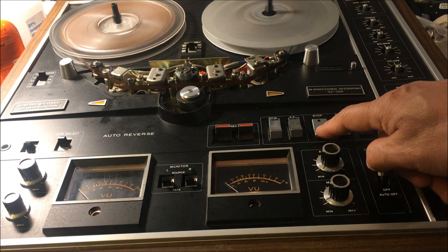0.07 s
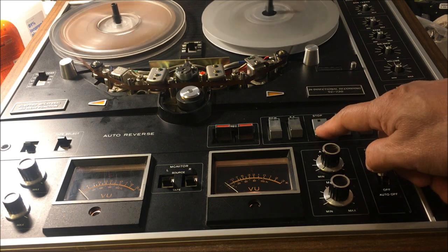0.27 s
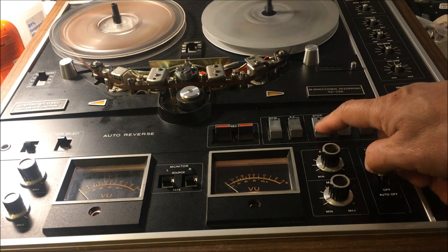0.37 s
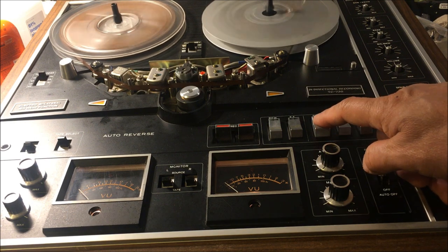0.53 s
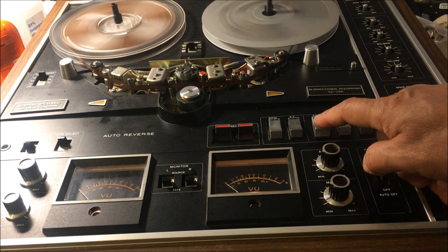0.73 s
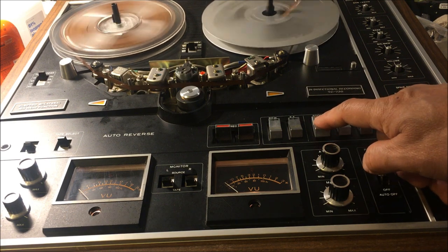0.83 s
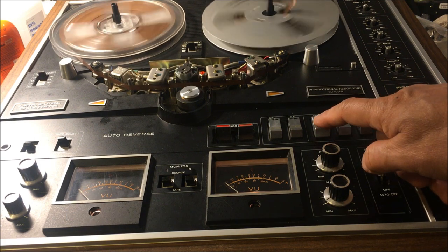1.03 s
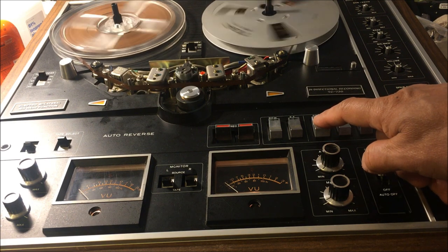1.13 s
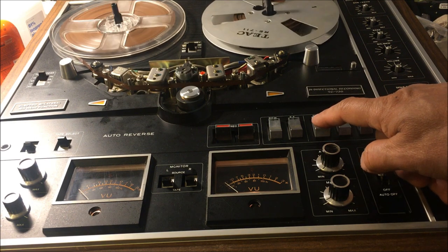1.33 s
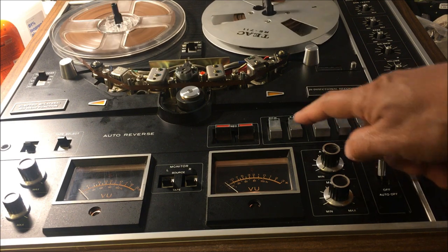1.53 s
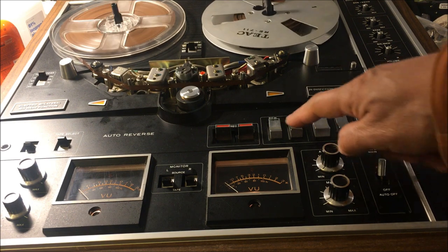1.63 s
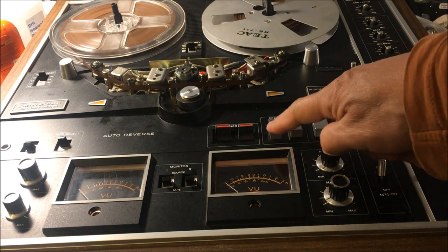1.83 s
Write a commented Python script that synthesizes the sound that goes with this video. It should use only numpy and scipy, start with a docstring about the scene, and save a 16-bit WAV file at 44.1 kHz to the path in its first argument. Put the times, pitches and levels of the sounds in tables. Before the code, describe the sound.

Loud mechanical key clack on a reel-to-reel deck, then spinning reels slow to a quiet motor hum.

```python
"""A low whirr and a hiss of tape are heard first: a reel-to-reel deck spooling close by in a small room.
The stop key trips its linkage in one dense, sharp clack that rings the chassis and swells the cabinet.
Whirr and hiss die away; a light tick, soft knocks and a brushing finger follow over the idling motor's hum.
Rubbing and blows are shaped noise, chassis and cabinet are decaying modes, the motor is unsteady tones."""
import sys
import numpy as np
from scipy import signal
from scipy.fft import rfft, irfft, next_fast_len
from scipy.io import wavfile
from scipy.ndimage import map_coordinates

SR = 44100
rng = np.random.default_rng(int(sys.argv[2]) if len(sys.argv) > 2 else 0)


def wav_record(signal):
    """Record a signal, one row per channel, as 16-bit PCM in the file named by sys.argv[1]."""
    frames = np.transpose(np.atleast_2d(signal))
    bounded = np.clip(frames, -1, 1)
    # unit amplitude maps onto the largest positive 16-bit level
    quanta = np.round(bounded * 32767).astype(np.int16)
    wavfile.write(sys.argv[1], SR, quanta)


N = 83790  # samples, 1.9 s

# Every noise spectrum gives relative levels; the noise is then scaled to rms 1.
# steady background noise, spectrum: frequency_hz, level_db
FLOOR_SPECTRUM = [(15, -32), (25, -2), (76, 0), (102, -5), (170, -8), (189, -14.5), (235, -0.5),
                  (276, -14.5), (324, -12), (437, -16), (905, -25.5), (1010, -23.5), (1180, -27),
                  (1550, -28), (15800, -40)]
FLOOR_DB = -69
# hum of the idling motor: frequency_hz, level_db, width_hz
MOTOR_TONES = [(75.2, -77.5, 18), (168, -81, 3.5), (229, -81.5, 20), (350, -86.5, 11)]

# whirr of the reel drive, level over time: time_s, level_db
WHIRR_LEVEL = [(0, -61), (.1, -58), (.22, -57), (.4, -61), (.56, -62.5), (.8, -74), (1.2, -86),
               (1.9, -89.5)]
# whirr of the reel drive, spectrum: frequency_hz, level_db
WHIRR_SPECTRUM = [(40, -13), (125, -13), (165, -4), (205, -1.5), (245, -0.5), (290, -10), (400, -18),
                  (900, -27), (3000, -50.5)]
# rubbing of the running tape, steady level over time: time_s, level_db
TAPE_LEVEL = [(0, -62.5), (.2, -62.5), (.42, -60), (.66, -63), (.9, -64.5), (1.1, -67), (1.26, -68.5),
              (1.32, -73.5), (1.42, -83), (1.55, -96.5), (1.9, -105)]
# rubbing of the running tape, spectrum: frequency_hz, level_db
HISS_SPECTRUM = [(300, -11.5), (500, -12), (700, -5), (1000, -3.5), (1400, -5), (2100, -5), (2700, -10.5),
                 (3900, -5), (4700, -8), (5500, -6.5), (6500, -9.5), (9500, -7), (10600, -10.5),
                 (11600, -7), (15800, -16)]
# ringing of the reels under the tape: frequency_hz, level_over_hiss_db, width_hz
REEL_TONES = [(862, -17, 35), (1050, -21, 51), (1355, -18, 55), (5450, -19.5, 380)]
# grazes of the tape on a reel flange: peak_s, level_over_rubbing_db
GRAZES = [(.465, 2), (.58, 3), (.658, 3.5), (.718, 2.5), (.795, 4), (.872, 3), (.98, 2.5), (1.072, 3),
          (1.181, 4.5), (1.248, 4)]
GRAZE_WIDTH_S = 0.0105
FLUTTER_RATE_HZ, FLUTTER_DB = 90, 1.0  # random changes a second and their depth

# small steel catch: start_s, level_db
TICKS = [(0.5276, -43.5)]
# small steel catch, spectrum: frequency_hz, level_db
TICK_SPECTRUM = [(300, -43), (1500, -16), (2600, -11), (3600, -1), (5700, -13.5), (8300, -2), (10200, 0),
                 (11500, -24), (15500, -13)]
# soft knocks on the keys: start_s, level_db
TAPS = [(0.6313, -47), (1.111, -61), (1.59, -67.5)]
# soft knocks on the keys, spectrum: frequency_hz, level_db
TAP_SPECTRUM = [(50, 1), (105, 9), (250, -6), (480, 1), (900, -3), (1400, 0.5), (2000, -8.5), (3000, -24),
                (9000, -39.5)]
TICK_T60_S, TAP_T60_S = .03, 0.0659
# finger sliding over the keys, spectrum: frequency_hz, level_db
BRUSH_SPECTRUM = [(300, -13.5), (1400, 3.5), (2800, -1), (4500, -19.5), (12000, -35)]
BRUSH_S, BRUSH_WIDTH_S, BRUSH_DB = 1.755, .04, -81

# contacts of key and linkage: start_s, steel_snap_db, chassis_knock_db
CONTACTS = [(0.2274, -44.5, -53.5), (0.234, -49.5, -52.5), (0.2373, -29, -37), (0.2415, -27, -33.5),
            (0.246, -31.5, -29.5), (0.2489, -22.5, -33), (0.2519, -28, -29.5), (0.2559, -26.5, -28),
            (0.2591, -30, -27.5)]
# steel snap, spectrum: frequency_hz, level_db
SNAP_SPECTRUM = [(900, -20.5), (1500, -9), (2200, -3), (3050, -9), (3650, -1), (4300, -12.5), (5300, -12),
                 (6300, -5), (8000, -9.5), (9600, -8.5), (10700, -13.5), (12500, -13), (15800, -20.5)]
# chassis knock, spectrum: frequency_hz, level_db
KNOCK_SPECTRUM = [(60, -33.5), (150, -20), (230, -4.5), (330, -3.5), (500, -3), (800, -4), (1250, -3),
                  (1600, -7.5), (2000, -2.5), (2500, -4.5), (3000, -19), (3600, -11.5), (5000, -23.5)]
SNAP_T60_S, KNOCK_T60_S, SNAP_LOW_HZ = 0.033, 0.061, 1510
# modes of the chassis: frequency_hz, level_before_rise_db, t60_s
CHASSIS_MODES = [(450.8, -35.5, 0.079), (582, -34.5, .12), (709, -28.5, .08), (872, -29.5, .075),
                 (1031.6, -33, 0.11), (1146, -32.5, .08), (1703, -38.5, .06), (1880, -37.5, 0.048),
                 (2054, -38, 0.055), (2192, -33.5, .065), (2371, -36.5, 0.045), (2688, -40, 0.099),
                 (3300, -36, .08), (3770, -36, 0.023), (3840, -36, .06), (6050, -37, 0.038),
                 (7135, -40, .06)]
CHASSIS_AT_S, CHASSIS_RISE_S = .243, 0.0031
# modes of the cabinet: frequency_hz, level_before_rise_db, t60_s
CABINET_MODES = [(194, -32.5, 0.1411), (215, -30.5, .1), (307.7, -39.5, 0.15)]
CABINET_AT_S, CABINET_RISE_S = .255, 0.014
# thump of the cabinet, spectrum: frequency_hz, level_db
THUMP_SPECTRUM = [(35, -29.5), (70, -8), (105, -1), (160, -1.5), (250, 0), (340, -7), (500, -20),
                  (1500, -49.5)]
# the cabinet swells late under the blow; the level is the one before the rise
THUMP_S, THUMP_DB, THUMP_RISE_S, THUMP_T60_S = .263, -31.5, .025, .15

# decay of the room: frequency_hz, t60_s
ROOM_DECAY = [(100, .35), (300, .33), (1000, 0.37), (3000, 0.44), (8000, .3), (15000, 0.2)]
# colour of the room's tail: frequency_hz, level_db
ROOM_COLOUR = [(100, -0.5), (500, 0), (1100, 0.5), (2200, -4), (3600, -4), (6000, -2.5), (9000, -6),
               (15000, -5.5)]
ROOM_DB = -17
TOP_HZ = 15950  # upper band limit


def amp(db):
    """Level to amplitude: 20 dB is a factor of ten."""
    return 10 ** (np.asarray(db) / 20)


def unit(x):
    """Normalisation of mean power: scale to rms 1."""
    return x / np.sqrt(np.mean(x ** 2) + 1e-20)


def along(points, hz):
    """Interpolation of (frequency, value) points on a logarithmic frequency axis."""
    f, v = np.transpose(points)
    return np.interp(np.log(hz + 1), np.log(f + 1), v)


def clock():
    """Sampling: the time of each sample in seconds."""
    return np.arange(N) / SR


def curve(rows):
    """Linear interpolation in time between (time, value) points."""
    return np.interp(clock(), *np.transpose(rows))


def wobble(rate):
    """Slow random modulation: a smooth curve through rate random knots a second."""
    return map_coordinates(rng.standard_normal(512), [clock() * rate], mode="wrap")


def filtered(x, response):
    """Linear filtering: the spectrum of x times a response of frequency."""
    m = next_fast_len(N + SR // 2)  # padding keeps the end from wrapping onto the start
    return irfft(rfft(x, m) * response(np.fft.rfftfreq(m, 1 / SR)), m)[:N]


def noise(spectrum, low_hz=20):
    """Spectral shaping of white noise, with a roll-off under low_hz; rms 1."""
    def response(hz):
        roll_off = hz ** 2 / (hz ** 2 + low_hz ** 2)
        return amp(along(spectrum, hz)) * roll_off

    return unit(filtered(rng.standard_normal(N), response))


def tones(rows):
    """Narrow-band noise: random complex modulation broadens each tone to a band."""
    total = 0
    for hz, db, width_hz in rows:
        envelope = wobble(width_hz) + 1j * wobble(width_hz)
        carrier = np.exp(2j * np.pi * hz * clock())
        total = total + amp(db) * unit(np.real(envelope * carrier))
    return total


def rise(s, rise_s):
    """Exponential build-up from 0 at s towards 1."""
    return 1 - np.exp(-np.maximum(clock() - s, 0) / rise_s)


def swell(s, width_s):
    """Gaussian envelope that peaks at s."""
    return np.exp(-.5 * ((clock() - s) / width_s) ** 2)


def burst(s, db, t60):
    """Impulsive excitation at s, then exponential decay by 60 dB in t60 seconds."""
    age = clock() - s
    return (age >= 0) * amp(db - 60 * np.abs(age) / t60)


def ring(modes, s, rise_s):
    """Modal resonance: damped sines build up from s and decay, slightly unsteady in phase."""
    total = 0
    for hz, db, t60 in modes:
        cycles = hz * clock() + rng.random()
        total = total + burst(s, db, t60) * np.sin(2 * np.pi * cycles + 0.41 * wobble(120))
    return rise(s, rise_s) * total


def background():
    """Stationary noise: a steady floor of fixed spectrum."""
    return amp(FLOOR_DB) * noise(FLOOR_SPECTRUM, low_hz=34)


def idling_motor():
    """Tonal hum: a few low lines, each unsteady over its own width."""
    return tones(MOTOR_TONES)


def reel_drive():
    """Broadband drive noise: the low whirr fades as the reels slow."""
    return amp(curve(WHIRR_LEVEL)) * noise(WHIRR_SPECTRUM)


def running_tape():
    """Friction noise: the tape rubs unevenly, grazes a flange and rings the reels."""
    graze_db = sum(db * swell(s, GRAZE_WIDTH_S) for s, db in GRAZES)
    flutter_db = FLUTTER_DB * wobble(FLUTTER_RATE_HZ)
    level_db = curve(TAPE_LEVEL) + graze_db + flutter_db
    return amp(level_db) * (noise(HISS_SPECTRUM, low_hz=300) + tones(REEL_TONES))


def small_sounds():
    """Light impact and sliding friction: a bright tick, dull knocks and a fingertip on the keys."""
    ticks = sum(burst(s, db, TICK_T60_S) for s, db in TICKS) * noise(TICK_SPECTRUM)
    taps = sum(burst(s, db, TAP_T60_S) for s, db in TAPS) * noise(TAP_SPECTRUM)
    brush = amp(BRUSH_DB) * swell(BRUSH_S, BRUSH_WIDTH_S) * noise(BRUSH_SPECTRUM)
    return ticks + taps + brush


def stop_key():
    """Impact excitation: contacts snap and knock, chassis and cabinet answer with ring and thump."""
    # the powers of overlapping contacts add
    snap_envelope = np.sqrt(sum(burst(s, db, SNAP_T60_S) ** 2 for s, db, _ in CONTACTS))
    knock_envelope = np.sqrt(sum(burst(s, db, KNOCK_T60_S) ** 2 for s, _, db in CONTACTS))
    snap = snap_envelope * noise(SNAP_SPECTRUM, SNAP_LOW_HZ)
    knock = knock_envelope * noise(KNOCK_SPECTRUM, low_hz=200)
    thump_envelope = burst(THUMP_S, THUMP_DB, THUMP_T60_S) * rise(THUMP_S, THUMP_RISE_S)
    thump = thump_envelope * noise(THUMP_SPECTRUM)
    chassis = ring(CHASSIS_MODES, CHASSIS_AT_S, CHASSIS_RISE_S)
    cabinet = ring(CABINET_MODES, CABINET_AT_S, CABINET_RISE_S)
    return snap + knock + thump + chassis + cabinet


def room(x):
    """Reverberation: convolution with a noise tail whose decay time depends on frequency."""
    hz, t, z = signal.stft(rng.standard_normal(SR // 2), SR, nperseg=256)
    colour_db = along(ROOM_COLOUR, hz)[:, None]
    decay_db = 60 * t / along(ROOM_DECAY, hz)[:, None]
    tail = signal.istft(z * amp(colour_db - decay_db), SR, nperseg=256)[1]
    return signal.fftconvolve(x, tail / np.linalg.norm(tail))[:N]


def scene():
    """Superposition: background, motor, reels and tape, and the keys with their room tail."""
    keys = stop_key() + small_sounds()
    deck = idling_motor() + reel_drive() + running_tape()
    mix = background() + deck + keys + amp(ROOM_DB) * room(keys)
    return mix[None]


def record(dry):
    """Band limitation: nothing passes at or above TOP_HZ."""
    return filtered(dry[0], lambda hz: hz < TOP_HZ)[None]


dry = scene()
out = record(dry)
wav_record(out)
```